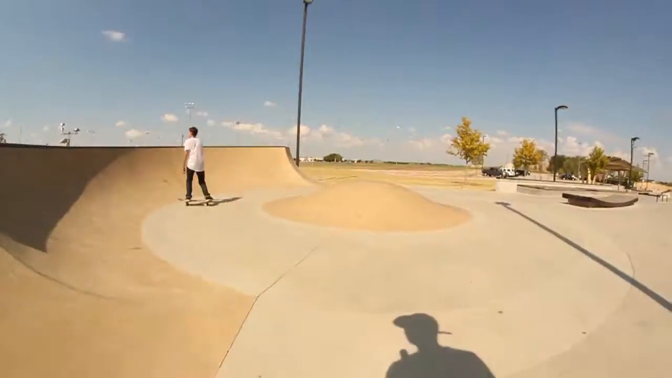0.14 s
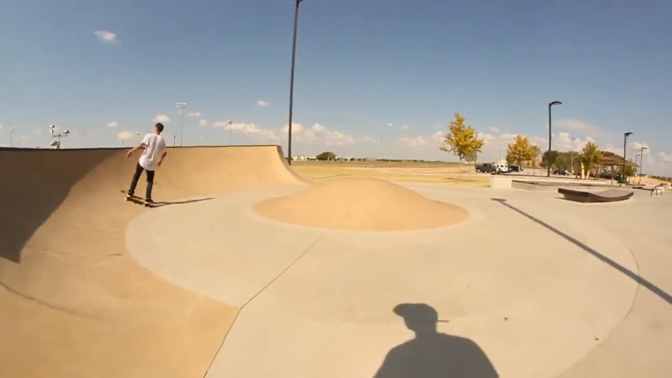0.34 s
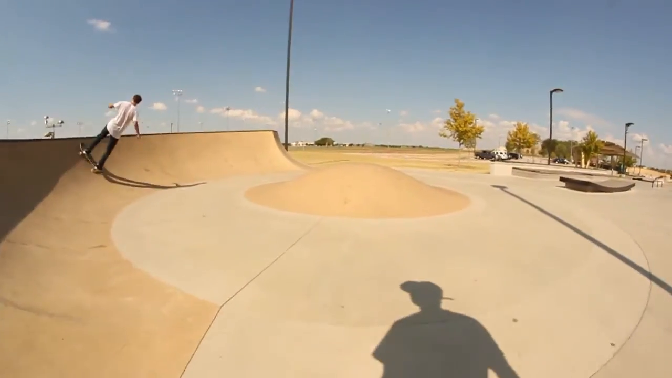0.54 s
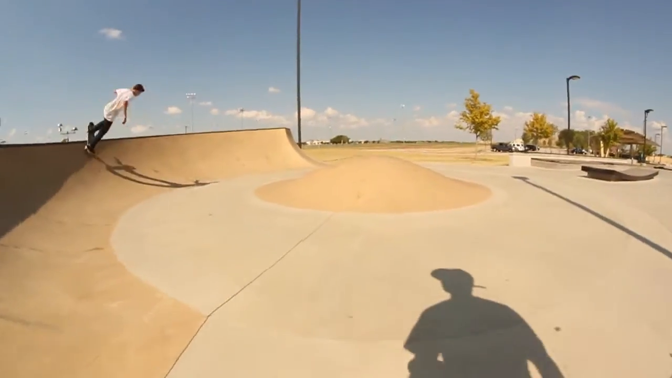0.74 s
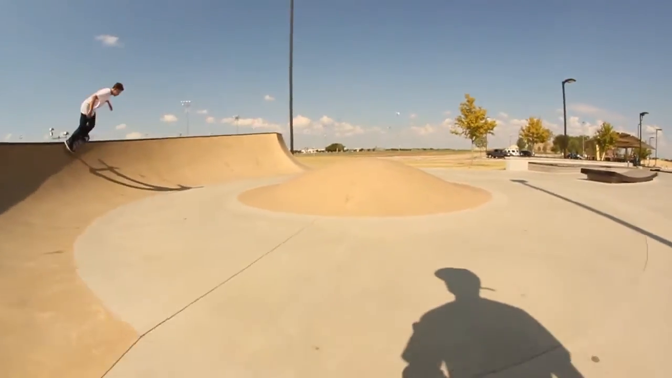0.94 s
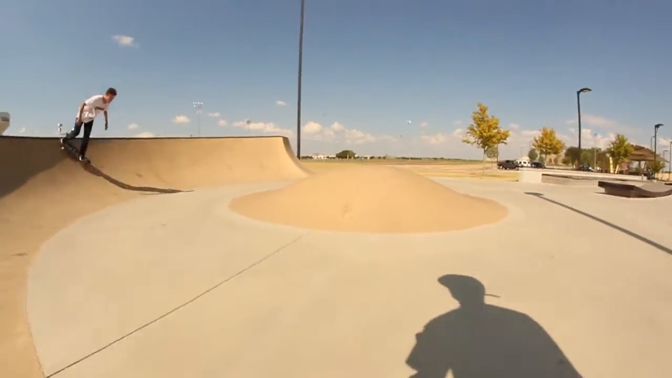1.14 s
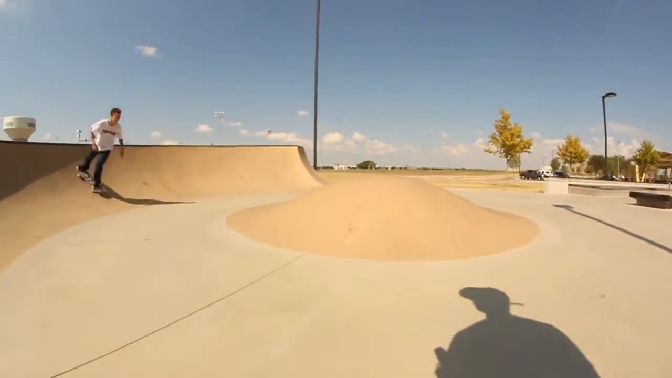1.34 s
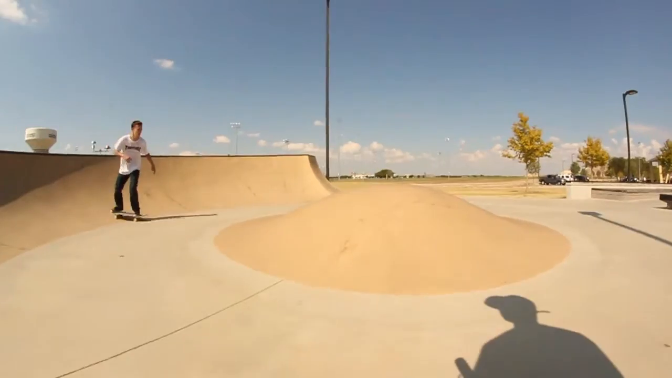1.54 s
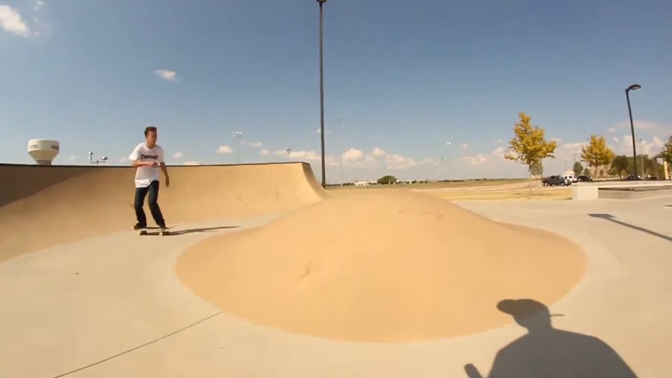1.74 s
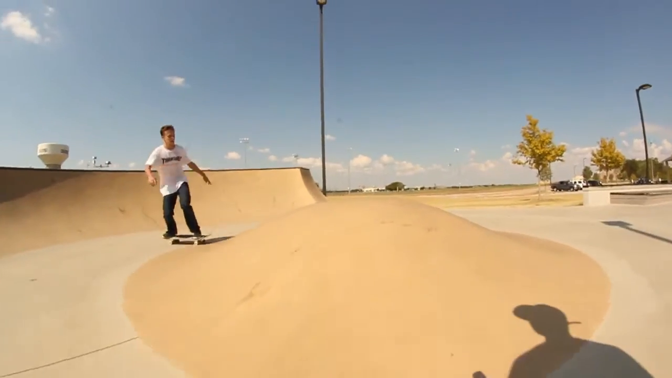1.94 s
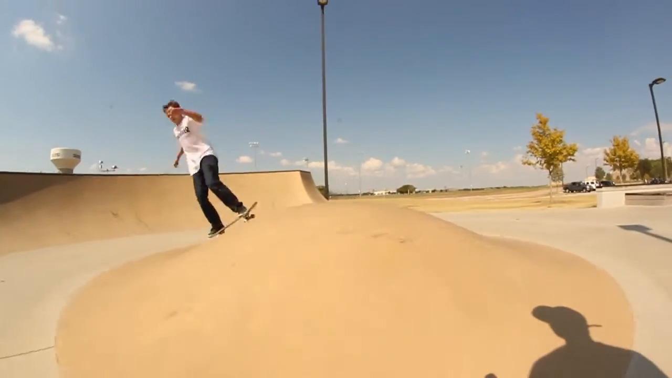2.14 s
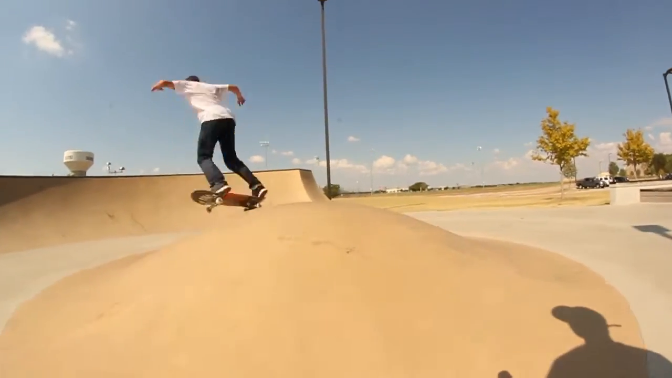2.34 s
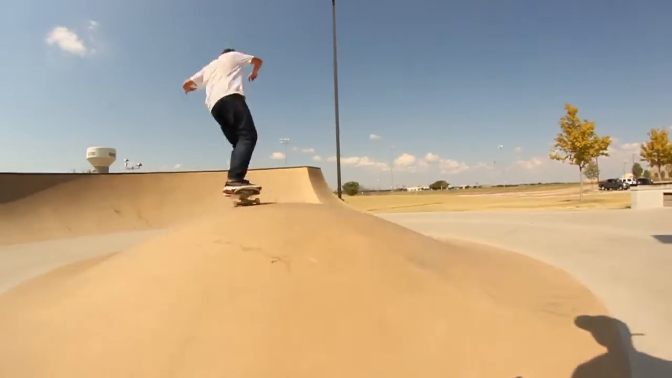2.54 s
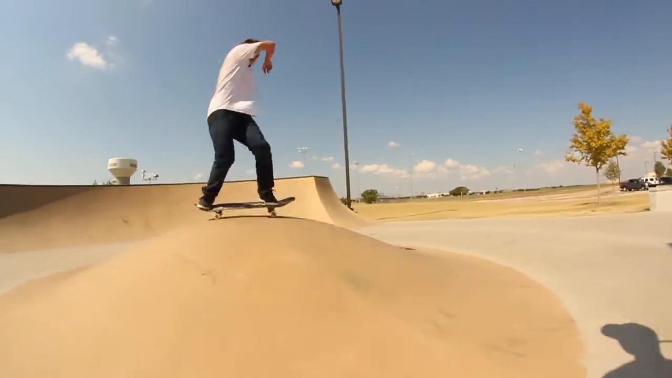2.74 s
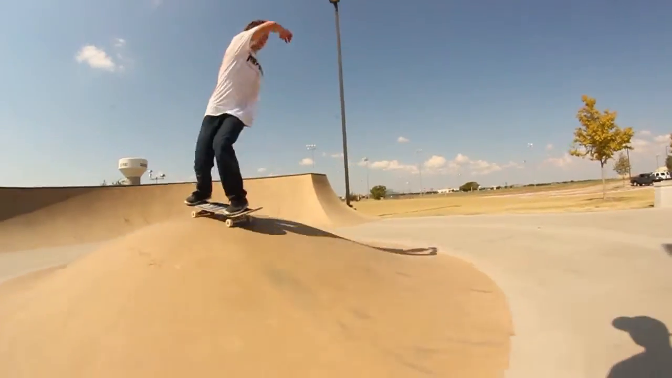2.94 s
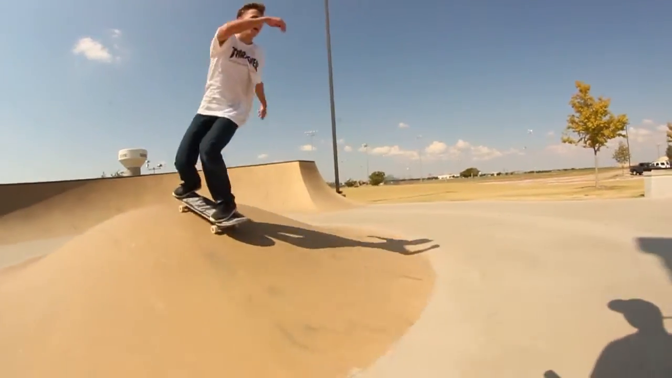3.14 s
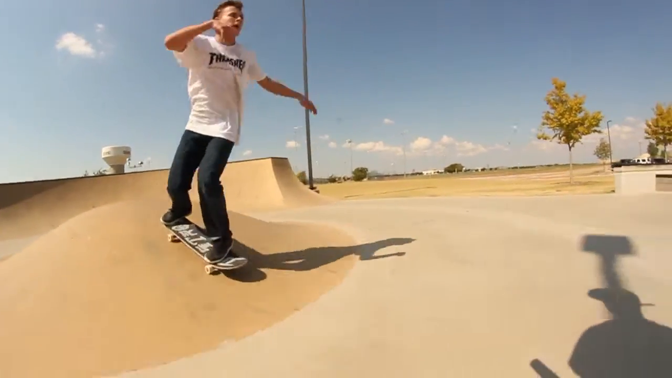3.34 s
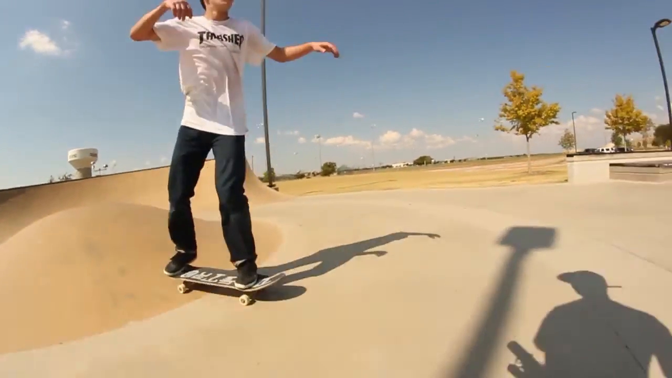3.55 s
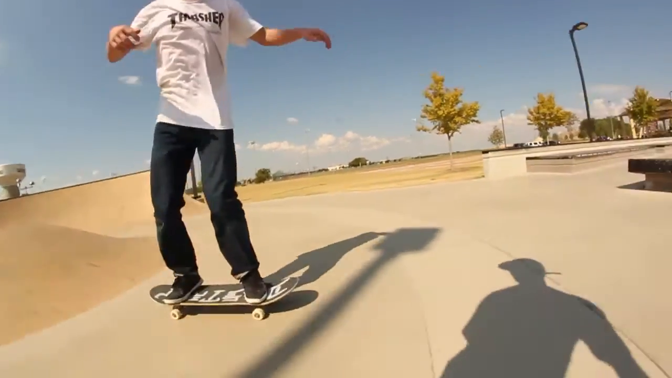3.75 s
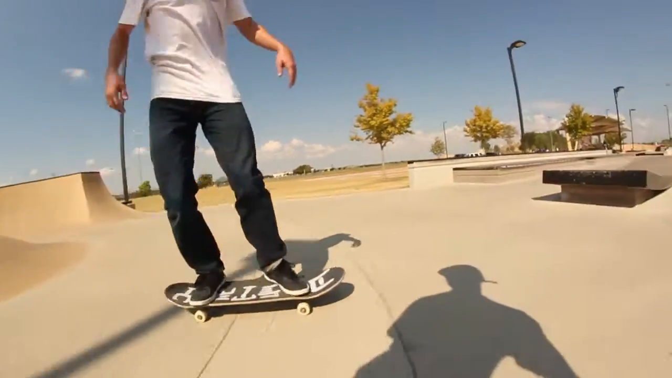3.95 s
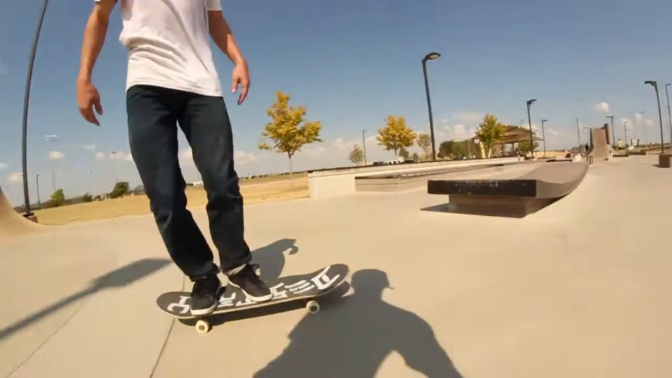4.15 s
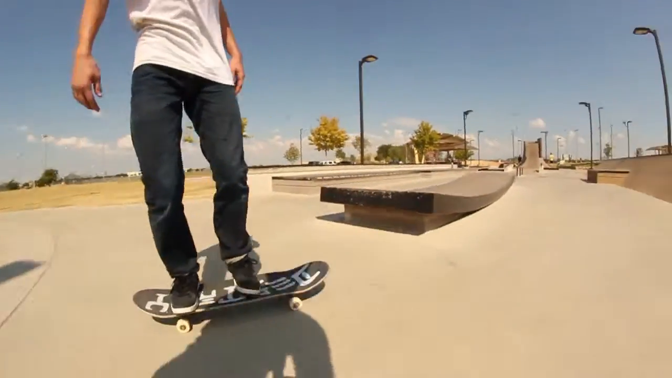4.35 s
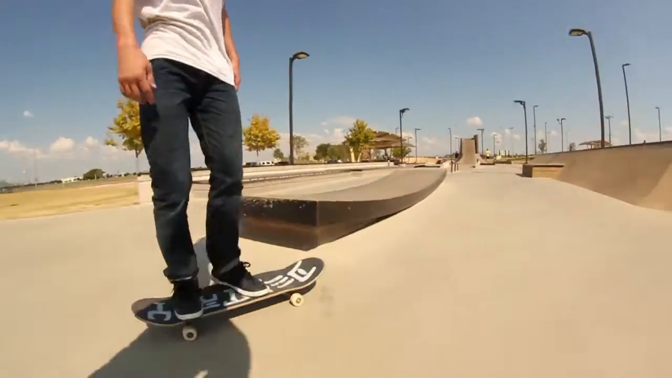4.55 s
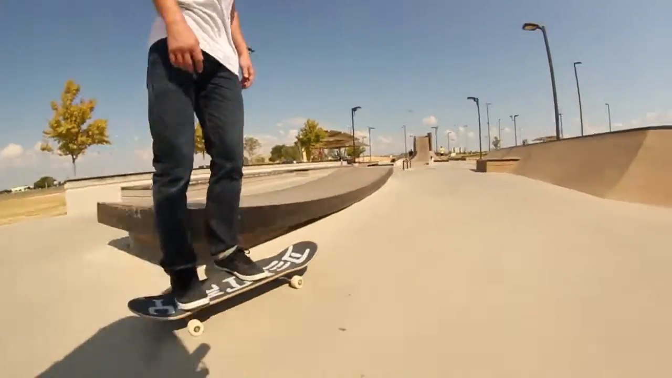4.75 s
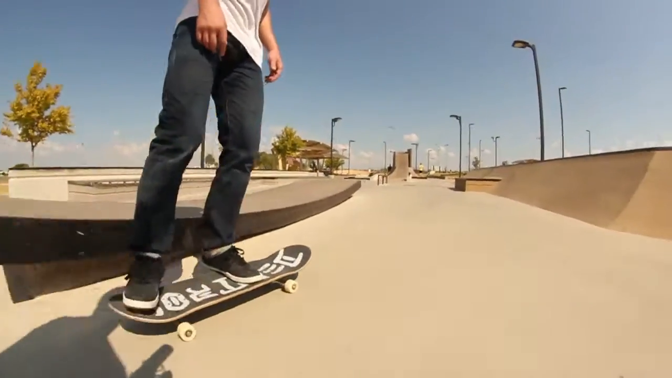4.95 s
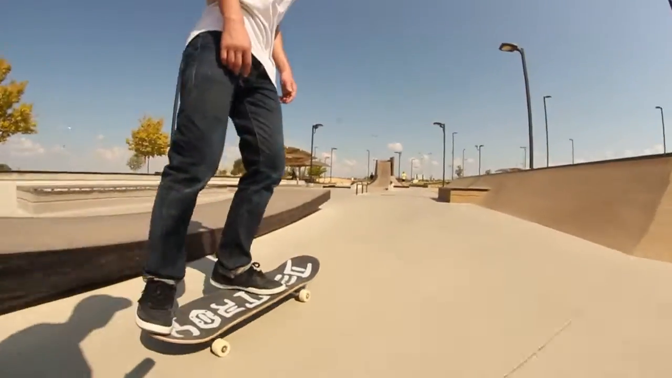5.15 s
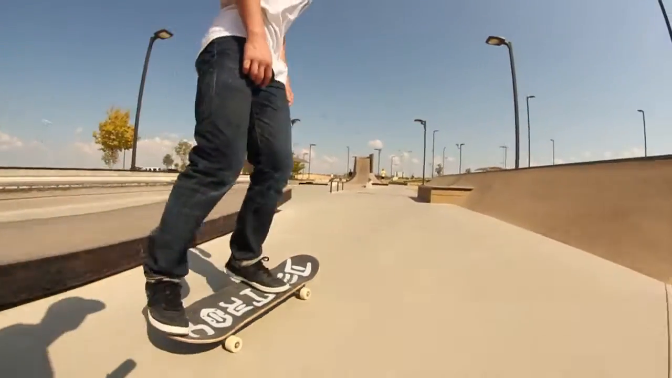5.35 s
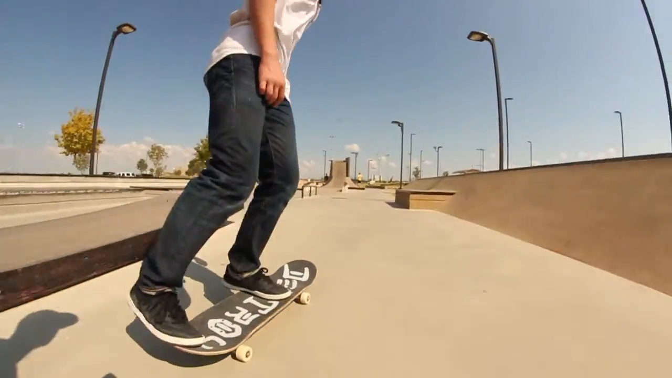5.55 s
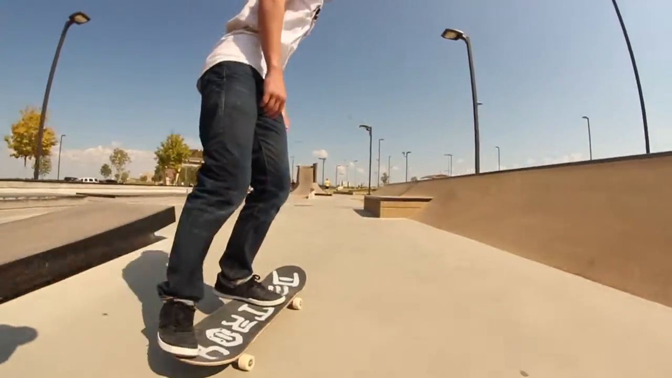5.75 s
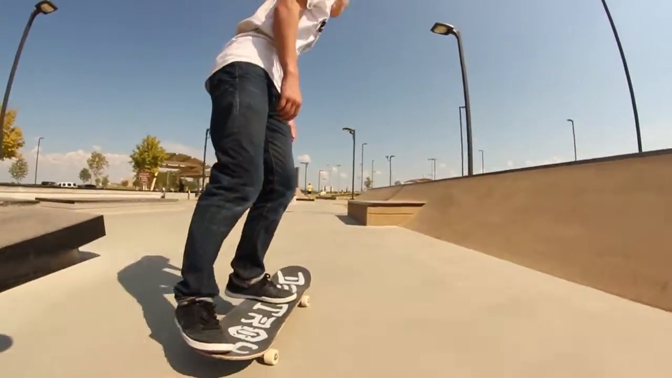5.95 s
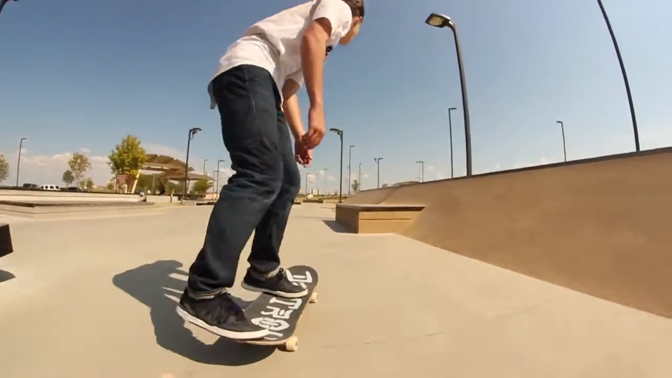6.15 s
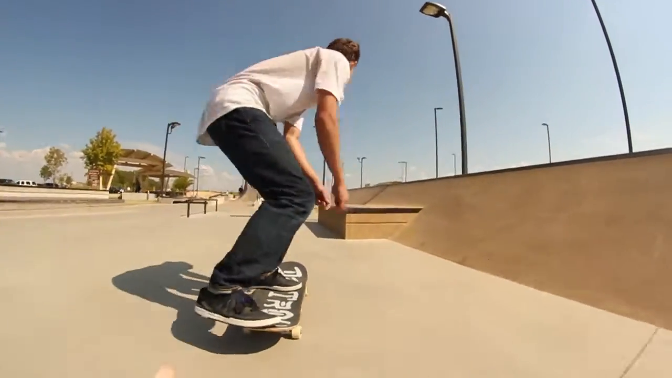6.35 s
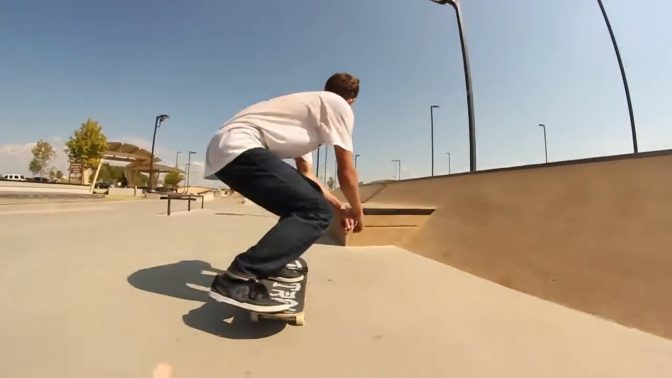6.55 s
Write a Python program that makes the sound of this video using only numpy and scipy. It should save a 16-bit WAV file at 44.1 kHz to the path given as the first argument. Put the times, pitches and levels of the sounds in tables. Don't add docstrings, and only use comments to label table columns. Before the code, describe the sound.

In an open outdoor concrete park, a skateboard begins fairly distant, its wheels rumbling softly, with dull knocks at 0.3-0.4 s and a swell of rolling near 0.5 s. It quiets, then at 1.25-1.38 s clacks and grinds in a rapid, rising stutter. Rolling returns and grows toward 2.1 s. Two short, barking wheel skids follow at 2.28-2.37 and 2.55-2.61 s, the second opening with a sharp wooden crack; smaller knocks and a scuff come around 2.7-2.96 s. Wind builds into low, flapping gusts that overload the microphone, strongest about 2.7-4.3 s. Hard clacks and a raspy slide hit at 3.97-4.19 s. Then close, gritty rolling continues with stone ticks, a joint knock at 5.05 s, and a cluster of clacks at 6.1-6.24 s. Wind eases around 5.3-6.2 s, then gusts again at 6.4 s. Far traffic rumble and faint hiss remain underneath throughout.

```python
import sys
import numpy as np
from scipy import signal
from scipy.fft import rfft, irfft, next_fast_len
from scipy.io import wavfile
from scipy.ndimage import uniform_filter1d, map_coordinates

SR = 44100
rng = np.random.default_rng(int(sys.argv[2]) if len(sys.argv) > 2 else 0)


def ratio_of_db(decibels):
    return 10 ** (np.asarray(decibels, float) / 20)


def dump_mix(stems):
    frames = np.atleast_2d(stems).T
    limited = np.clip(frames, -1, 1)
    pcm = np.round(limited * 32767).astype(np.int16)
    wavfile.write(sys.argv[1], SR, pcm)


N = 295029


def unit(x):
    return x / np.sqrt(np.mean(x ** 2) + 1e-20)


def span(start, end):
    return slice(round(start * SR), round(end * SR))


def curves(rows):
    s, *cols = np.transpose(rows)
    return [np.interp(np.arange(N) / SR, s, c) for c in cols]


def wobble(rate):
    knots = rng.standard_normal(int(N * rate / SR) + 4)
    return map_coordinates(knots, [np.arange(N) * rate / SR])


def filtered(x, response):
    m = next_fast_len(N + SR // 2)
    return irfft(rfft(x, m) * response(np.fft.rfftfreq(m, 1 / SR)), m)[..., :N]


def coloured(x, points):
    f, db = np.transpose(points)
    return unit(filtered(x, lambda hz: ratio_of_db(np.interp(np.log(hz + 1), np.log(f), db, -120, -120))))


def resonant(x, modes):
    def response(f):
        return sum((-1) ** k * ratio_of_db(db) * 1j * f * w / (c * c - f * f + 1j * f * w)
                   for k, (c, w, db) in enumerate(modes))
    return unit(filtered(x, response))


def grit(rate, spread_db, share):
    struck = rng.random(N) < rate / SR
    grains = struck * ratio_of_db(spread_db * rng.standard_normal(N)) * np.sign(rng.standard_normal(N))
    return np.sqrt(1 - share) * rng.standard_normal(N) + np.sqrt(share) * unit(grains)


def steadied(x, span_s, depth):
    return unit(x / (uniform_filter1d(np.abs(x), round(span_s * SR)) + 0.04) ** depth)


def park():
    # frequency in Hz, level in dB per Hz.
    spectrum = [(15, 0), (40, -13), (120, -9), (250, -25), (1000, -66), (5000, -34), (9000, -47),
                (15900, -35)]
    return ratio_of_db(-50.0) * coloured(rng.standard_normal(N), spectrum)


def wind():
    # frequency in Hz, level in dB per Hz.
    push = [(8, -28), (16, -6), (40, 5.5), (60, -2), (90, -6.5)]
    buffet = [(35, -34), (55, -1), (75, 2.5), (110, -1), (140, -20), (200, -65)]
    flutter = [(85, -11), (120, -1), (150, 1), (200, -5.5), (280, -11.5), (450, -25.5), (900, -67)]
    # time in seconds, pressure in dB, smallness of the eddies in dB,
    # shedding off the camera body in dB.
    air = [(0, -36, -2, 0), (.2, -47, -1, -12), (.56, -41.5, 1.5, -18), (.8, -46, -8.5, 0),
           (1.38, -42, -1.5, 0), (1.9, -32.5, -1, 2.5), (2.35, -25.5, -0.5, 4.5), (2.68, -19.5, 2, -2.5),
           (2.98, -19, 0, 6), (3.6, -25.5, -0.5, -1), (4.05, -11, -2, 1), (4.35, -15.5, 3, 2.5),
           (4.62, -24, 3.5, -1), (5.05, -21, 7.5, -4.5), (5.35, -27, 1, -2), (5.65, -23.5, 1, -0.5),
           (6.17, -36, 0, 5), (6.69, -21, 1.5, -7)]
    # peak in seconds, pressure in dB, half length in seconds, smallness in dB.
    gusts = [(0.085, -45, 0.13, -9), (0.684, -31, 0.088, -1), (0.878, -46, 0.052, -10),
             (1.112, -34.5, 0.25, -3), (1.532, -39, 0.024, -8), (1.738, -29.5, 0.11, 1.5),
             (1.973, -28.5, 0.04, -7), (2.112, -28, 0.052, -10), (2.25, -21.5, .06, -4.5),
             (2.516, -17.5, 0.056, -1.5), (2.729, -14, 0.04, -5), (2.87, -18, 0.12, -3),
             (3.128, -10.5, 0.044, -1.5), (3.275, -10, 0.032, -3.5), (3.333, -8, 0.03, 0.5),
             (3.485, -11, 0.21, -1.5), (3.74, -11, 0.28, -0.5), (3.885, -13.5, 0.03, -9),
             (4.192, -7, 0.078, -0.5), (4.456, -17, 0.077, 0.5), (4.705, -15.5, 0.076, 2),
             (4.939, -12, 0.14, -1), (5.22, -19, 0.15, -2), (5.442, -20.5, 0.084, 1), (5.76, -24, 0.077, 1),
             (5.92, -25, 0.1, 0), (6.094, -25.5, 0.045, 0.5), (6.282, -25.5, 0.054, 4.5),
             (6.405, -13.5, 0.087, -2), (6.625, -16.5, 0.11, 0.5)]
    lean = np.array([[-1], [0.9], [1]])
    grows = np.array([[0.92], [1.025], [1]])
    calm_db = np.array([[-0.5], [-3], [0]])
    push_db, buffet_db, flutter_db = -4, -2.5, -7

    def sizes(db, small_db):
        return ratio_of_db(grows * (db + 20) - 19.5 + lean * small_db)

    t = np.arange(N) / SR
    air_db, small_db, shed_db = curves(air)
    power = (ratio_of_db(calm_db) * sizes(air_db, small_db)) ** 2
    power[1] *= ratio_of_db(shed_db) ** 2
    for s, db, length, gust_small_db in gusts:
        n = slice(max(round((s - length) * SR), 0), round((s + length) * SR))
        swell = np.cos(np.pi / 2 * (t[n] - s) / length) ** 2
        power[:, n] += (sizes(db, gust_small_db) * swell) ** 2

    slow = steadied(coloured(rng.standard_normal(N), push), 0.06, 1.0)
    middle = steadied(coloured(rng.standard_normal(N), buffet), 0.037, 0.41)
    unrest = ratio_of_db(0.3 * wobble(26) + 5.0 * wobble(40))
    fast = steadied(coloured(unrest * rng.standard_normal(N), flutter), 0.035, 0.46)
    return ratio_of_db([push_db, buffet_db, flutter_db]) @ (np.sqrt(power) * [slow, middle, fast])


def singing():
    # start in seconds, end in seconds, frequency in Hz, width in Hz, level in dB.
    sung_modes = [(4.3, 4.78, 650, 70, -28), (5.3, 6.4, 518, 21, -39.5), (5.45, 6.69, 1790, 110, -42.5),
                  (3.97, 4.2, 590, 230, -24.5), (3.96, 4.12, 400, 120, -26.5), (.86, 1.135, 1700, 810, -47),
                  (1.248, 1.262, 2360, 500, -22), (2.292, 2.312, 520, 99, -20),
                  (2.285, 2.312, 930, 81, -20.5), (2.326, 2.345, 5860, 400, -21),
                  (2.553, 2.578, 4140, 320, -19), (2.605, 2.612, 3500, 600, -25),
                  (4.017, 4.027, 3150, 400, -25.5), (4.192, 4.2, 3150, 400, -20),
                  (4.085, 4.104, 5600, 820, -24.5), (6.108, 6.116, 3000, 430, -31),
                  (6.118, 6.142, 500, 57, -24), (6.223, 6.231, 1760, 1100, -24), (0, .2, 12500, 4000, -60),
                  (2.36, 2.55, 12500, 5000, -47), (2.36, 2.55, 5600, 1500, -44),
                  (2.61, 2.77, 12500, 5000, -54), (2.86, 2.945, 13000, 3000, -51),
                  (1.258, 1.268, 690, 120, -20), (1.345, 1.362, 760, 80, -17),
                  (1.04, 1.17, 4000, 3000, -50), (3.42, 3.62, 2850, 700, -37), (3.4, 5.5, 5350, 350, -43),
                  (3.19, 3.3, 3000, 1500, -47), (1.376, 1.395, 740, 200, -30), (5.3, 5.42, 1900, 900, -38)]
    out = np.zeros(N)
    lead = SR // 10
    for start, end, hz, width_hz, db in sung_modes:
        n = span(start, end)
        b, a = signal.iirpeak(hz, hz / width_hz, SR)
        mode = signal.lfilter(b, a, rng.standard_normal(len(out[n]) + lead))[lead:]
        swell = np.abs(np.sin(np.linspace(0, np.pi, len(mode)))) ** 0.39
        out[n] += ratio_of_db(db) * swell * unit(mode)
    return out


def chatter():
    # start in seconds, end in seconds, first beat in Hz, last beat in Hz, level in dB.
    beats = [
        (1.326, 1.378, 345.2, 440, -18),
        (2.324, 2.366, 239.6, 298, -20),
        (2.575, 2.609, 340, 410, -17.5),
    ]
    # multiple of the beat, level in dB.
    overtones = [(1, -7), (2, 1), (3, -4), (4, -11), (5, -9), (6, -18)]
    out, waver, flicker = np.zeros(N), wobble(120), wobble(150)
    for start, end, first_hz, last_hz, db in beats:
        n = span(start, end)
        u = np.linspace(0, 1, len(out[n]))
        beat_hz = (first_hz + (last_hz - first_hz) * u ** 2.5) * (1 + .03 * waver[n])
        turn = 2 * np.pi * np.cumsum(beat_hz) / SR
        stack = sum(ratio_of_db(level_db) * np.sin(round(k) * turn) for k, level_db in overtones)
        swell = np.abs(np.sin(np.pi * u)) ** 1.25
        out[n] += ratio_of_db(db + 2.6 * flicker[n]) * swell * unit(stack)
    return out


def skids():
    # frequency in Hz, width in Hz, level in dB.
    shaken = [(422, 108, 0), (730, 61, 1), (930, 210, -4), (1102, 86, -0.5), (1310, 290, -9)]
    rasp = [(1924, 97, 6), (2180, 650, -7), (3410, 390, 2), (3900, 660, -1.5), (5780, 900, -4.5)]
    far_rasp = [(1810, 120, 5), (2250, 600, 0), (3300, 700, 0), (4200, 700, -2)]
    # frequency in Hz, level in dB per Hz.
    scrape = [(4500, -23), (6300, -10), (7500, -7), (10200, -2.5), (12500, -5.5), (15800, -9)]
    far_scrape = [(4500, -8), (6000, -8), (7000, -7), (9000, 0), (10800, -3), (12400, -13), (14000, -4),
                  (15800, -2)]
    # start in seconds, hardest moment in seconds, end in seconds, deck level in dB, truck rasp in dB
    grinds = [
        (1.246, 1.25, 1.282, -19, 2),
        (1.262, 1.27, 1.283, -24, 3),
        (1.276, 1.284, 1.294, -20, 3),
        (1.29, 1.294, 1.301, -22, 3),
        (1.299, 1.303, 1.315, -20, 3),
        (1.309, 1.316, 1.33, -21, 3),
        (1.318, 1.327, 1.348, -21, 1),
        (1.325, 1.352, 1.384, -18, 0),
    ]
    slides = [
        (3.076, 3.096, 3.104, -37, 10),
        (3.102, 3.107, 3.12, -36.5, 9.5),
        (3.199, 3.202, 3.208, -42, 5),
        (4.05, 4.062, 4.08, -23, 0),
        (4.068, 4.094, 4.128, -19, 0),
    ]
    pivots = [(2.276, 2.292, 2.297, -21, -8), (2.293, 2.297, 2.316, -13.5, -2.5),
              (2.309, 2.317, 2.324, -22, -7), (2.32, 2.332, 2.348, -15.5, -1),
              (2.334, 2.349, 2.368, -14.5, -2), (2.546, 2.548, 2.564, -14, -4),
              (2.55, 2.559, 2.584, -13, -3), (2.566, 2.575, 2.592, -17, -4),
              (2.578, 2.594, 2.611, -15, -4.5), (2.941, 2.943, 2.957, -19.5, -2),
              (2.955, 2.961, 2.974, -20.5, -3.5)]
    scuffs = [
        (2.202, 2.207, 2.222, -27, -1),
        (2.514, 2.517, 2.545, -33, -6),
        (2.62, 2.645, 2.68, -40, -6),
        (2.684, 2.688, 2.707, -30, -8),
        (2.721, 2.729, 2.752, -29, -9),
        (2.86, 2.9, 2.945, -45, -16),
    ]
    bite_db, let_go_db = 14, 13
    touch_s, leave_s = .0012, .005

    slips = .5 + .5 * np.cos(2 * np.pi * np.cumsum(125 * ratio_of_db(2.5 * wobble(30))) / SR)
    rub = grit(2500, spread_db=3.2, share=.3) * (1.6 + slips ** 1.5)
    tread = grit(1500, spread_db=5, share=.45) * (1.1 + slips ** 1.6)
    deck = filtered(resonant(rub, shaken), lambda hz: (1j * hz / (350 + 1j * hz)) ** 2)
    near = np.array([deck, -ratio_of_db(-2.2) * resonant(rub, rasp), coloured(tread, scrape)])
    far = np.array([deck, -ratio_of_db(-2.2) * resonant(rub, far_rasp), coloured(tread, far_scrape)])

    out, t = np.zeros(N), np.arange(N) / SR
    # moves, rubber hiss in dB over the deck, view
    kinds = ((grinds, -16, far), (slides, -15, near), (pivots, -12, near), (scuffs, -12, near))
    for rows, hiss_db, layers in kinds:
        for start, top, end, deck_db, rasp_db in rows:
            n = span(start, end)
            sag_db = np.interp(t[n], [start, top], [bite_db, 0])
            sag_db += let_go_db * np.interp(t[n], [top, end], [0, 1]) ** 1.6
            contact = np.clip(np.minimum((t[n] - start) / touch_s, (end - t[n]) / leave_s), 0, 1)
            body = ratio_of_db([0, rasp_db]) @ layers[:2, n]
            hiss = ratio_of_db(hiss_db + 0.3 * sag_db) * layers[2, n]
            out[n] += contact * ratio_of_db(deck_db - sag_db) * (body + hiss)
    return out


def clacks():
    # time in seconds, peak in dB, pitch in Hz,
    # truck snap in dB over the peak.
    knocks = [(.328, -9.5, 507, -40), (.403, -15, 860, -22), (1.248, -12, 815, 1.5),
              (1.259, -7.5, 690, -17), (3.193, -24, 905, -6), (1.678, -22, 385, -16),
              (1.811, -16, 630, -5.5), (2.547, -2.5, 876, -9.5), (2.685, -23, 1050, -11),
              (2.942, -16, 1060, -12), (3.381, -24, 485, -9), (3.46, -10.5, 415, -22),
              (3.563, -21, 975, -12), (3.664, -16, 846, -18), (3.969, 0.5, 604, -10.5),
              (4.019, -8.5, 725, -9.5), (4.058, 1, 653, -10.5), (4.074, -7, 655, -17),
              (4.134, -8, 620, -21), (4.19, -4, 900, -12), (4.287, -16, 664, -23), (5.048, -17, 678, -9),
              (5.318, -25, 804, -4), (2.727, -20, 620, -18), (2.96, -10.5, 340, -27),
              (6.107, -7.5, 863, -11), (6.119, -12, 490, -14), (6.224, -9, 476, -7), (6.235, -8, 480, -21),
              (6.244, -26, 510, -11)]
    # time in
    # seconds, tick level in dB.
    pebbles = [(.403, -40), (0.686, -49), (1.488, -42), (1.811, -35), (1.887, -43), (2.516, -36.5),
               (2.945, -27), (3.067, -44), (3.715, -33.5), (3.906, -32), (4.092, -29), (4.39, -35),
               (5.291, -34.5), (5.4, -35), (5.788, -42), (2.44, -43), (2.851, -54), (1.248, -28),
               (2.547, -27), (2.942, -28), (3.969, -24.5), (4.058, -31), (4.19, -37), (6.108, -42),
               (2.958, -38), (2.961, -35), (3.104, -46)]
    # time in seconds,
    # level in dB.
    stones = [(3.6616, -20), (3.7464, -23), (4.2323, -23), (4.2862, -21), (4.8419, -24), (5.0494, -23),
              (5.1382, -20), (5.2694, -23), (5.3677, -20), (5.8421, -24), (6.2771, -23), (6.5899, -24)]
    # frequency in Hz, width in Hz, level in dB.
    snap_modes = [(1140, 270, 8.5), (1820, 620, 3), (2870, 1560, -4.5)]
    # frequency in Hz, level in dB per Hz.
    tick_spectrum = [(3000, 6), (4200, -4), (5500, 0), (7500, -8.5), (12000, -10), (15800, -16)]
    ring_s = 0.02
    tail_cycles, tail_db = 50, -18

    # time, thump dB, pitch Hz, snap dB, tick dB; stones leave the deck silent
    hits = [(s, db, hz, db + snap_db, db + snap_db - 26) for s, db, hz, snap_db in knocks]
    hits += [(s, -120, 1, db, db) for s, db in pebbles]
    hits += [(s, -120, 1, db - 16, db - 16) for s, db in stones]

    out, t = np.zeros((3, N + SR)), np.arange(SR // 8) / SR
    for s, db, hz, snap_db, tick_db in hits:
        turn = 2 * np.pi * hz * t
        thump = np.sin(turn) + .5 * np.sin(1.463 * turn) + 0.21 * np.sin(2.4 * turn)
        thump *= ratio_of_db(-60 * t / ring_s)
        thump += ratio_of_db(tail_db - 60 * t * hz / tail_cycles) * np.sin(turn)
        thump *= ratio_of_db(db) * (1 - np.exp(-t / 0.00057))
        decay = ratio_of_db(-60 * t / 0.032) + 1.6 * ratio_of_db(-60 * t / 0.0053)
        burst = decay * (1 - np.exp(-t / 0.00025)) * rng.standard_normal(len(t))
        hit = np.array([thump, ratio_of_db(snap_db - 3.5) * burst, ratio_of_db(tick_db + 4.0) * burst])
        out[:, round(s * SR):][:, :len(t)] += hit
    thumps, snaps, ticks = out[:, :N]
    axle = np.std(snaps) * resonant(snaps, snap_modes)
    return thumps + axle + np.std(ticks) * coloured(ticks, tick_spectrum)


def rolling():
    # time in seconds, loudness in dB, how far the tread faces the microphone in dB.
    ride = [(0, -31, -2), (.15, -38.5, -1), (.45, -28, -2.5), (.8, -43, -1), (1.02, -42, -4),
            (1.28, -47, 3.5), (1.43, -33, 1), (1.9, -34, 1), (2.08, -26.5, 1), (2.72, -42.5, 3.5),
            (3.28, -35, 0), (3.45, -28, 3), (3.76, -24.5, 0.5), (4.15, -20.5, -1), (4.32, -25.5, 0.5),
            (5.1, -25, 0), (5.7, -28.5, 3.5), (6.69, -30, 3.5)]
    # centre in seconds, length in seconds, gain in dB.
    rough = [(.5, 0.07, -1.5), (0.972, 0.099, 1), (1.62, 0.028, 2.5), (2.424, 0.11, 1.5), (3.224, 0.017, 1),
             (3.526, 0.059, 1), (4.6, .1, -1), (4.878, 0.072, -2), (5.141, 0.028, 4.5), (5.377, 0.075, 3),
             (5.637, 0.15, -1)]
    # frequency in Hz, width in Hz, level in dB.
    deck_modes = [(340, 90, -5.5), (490, 77, -1), (569, 87, -1), (697, 155, -1.5)]
    plies = [(880, 269, 1), (1120, 148, 2), (1315, 194, 0.5), (1445, 186, 0.5), (1785, 370, -10)]
    trucks = [(2085, 385, 0.5), (3180, 970, 1.5), (4170, 690, -1), (5380, 990, -3), (7000, 1200, -39)]
    # frequency in Hz, level in dB per Hz.
    hiss_spectrum = [(5200, -24), (6600, -4), (7600, 1), (9000, -0.5), (11000, -1), (13000, -5),
                     (15800, -10)]

    loud_db, facing_db = curves(ride)
    t = np.arange(N) / SR
    loud_db += sum(db * np.exp(-((t - s) / length) ** 2) for s, length, db in rough)
    patch_db = .7 * wobble(11) + 1.3 * wobble(35)
    road = grit(1200, spread_db=3.0, share=0.24)
    sand = grit(700, spread_db=5.5, share=0.3)
    dust = grit(900, spread_db=4.5, share=.25)

    boom = ratio_of_db(-4.5 - 0.35 * facing_db) * resonant(road, deck_modes)
    rattle = ratio_of_db(-6 + 0.55 * facing_db) * resonant(road, plies)
    wheels = ratio_of_db(-10 + facing_db + 0.63 * wobble(14)) * resonant(sand, trucks)
    mean_db = loud_db.mean()
    hiss_db = -22.5 + 2.36 * facing_db + mean_db + 0.9 * (loud_db - mean_db)
    hiss = ratio_of_db(hiss_db + .6 * patch_db) * coloured(dust, hiss_spectrum)
    return ratio_of_db(loud_db + patch_db) * (boom + rattle + wheels) + hiss


def ground(x):
    # time in seconds, first notch in Hz, strength from 0 to 1.
    mirror = [(0, 19100, .3), (.25, 14500, .6), (.42, 8800, .65), (.55, 6600, .7), (.75, 5000, .5),
              (.95, 4400, .5), (1.1, 6500, 0), (1.45, 6300, .5), (1.7, 7800, .65), (1.92, 9800, .6),
              (2.2, 17000, .2), (3, 12600, .2), (3.4, 11000, .7), (3.8, 15000, .15), (4.5, 13700, .15),
              (5.2, 9500, .15), (5.95, 8900, .6), (6.69, 12800, .65)]
    notch_hz, strength = curves(mirror)
    late = map_coordinates(x, [np.arange(N) - SR / (2 * notch_hz)])
    return (x + strength * late) / (1 + strength / 2)


def scene():
    board = singing() + chatter() + skids() + clacks() + rolling()
    return (park() + wind() + ground(board))[None]


def low_pass(x):
    return signal.sosfilt(signal.butter(12, 16960, fs=SR, output="sos"), x)


def record(dry):
    clipped = np.clip(dry, -1, 1)
    mix = filtered(clipped, lambda hz: hz < 15950)
    return low_pass(mix)


dry = scene()
out = record(dry)
dump_mix(out)
```